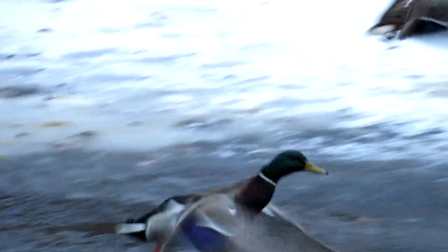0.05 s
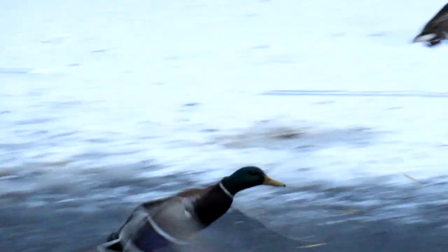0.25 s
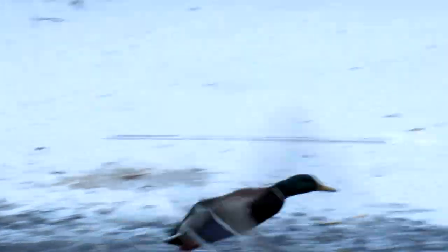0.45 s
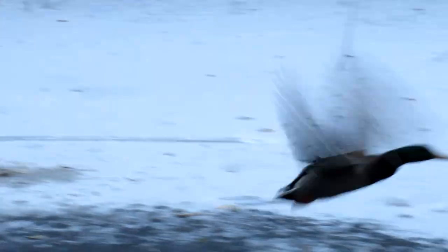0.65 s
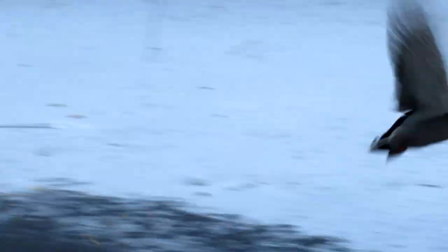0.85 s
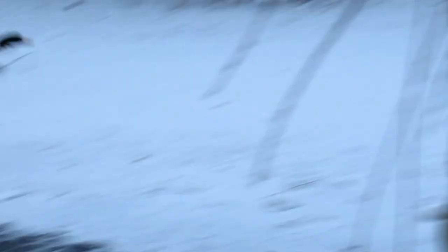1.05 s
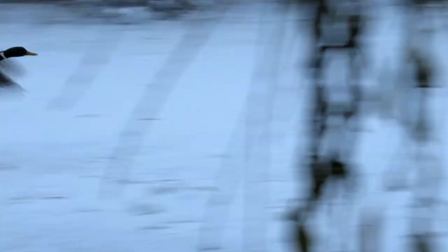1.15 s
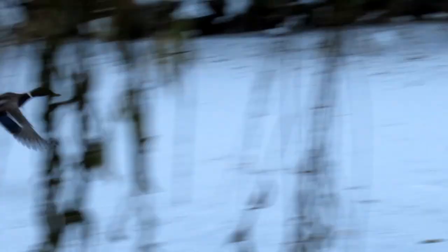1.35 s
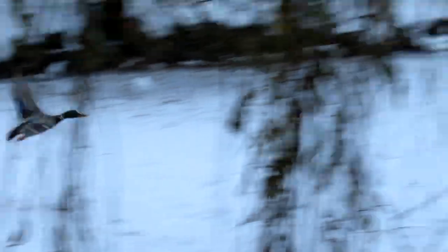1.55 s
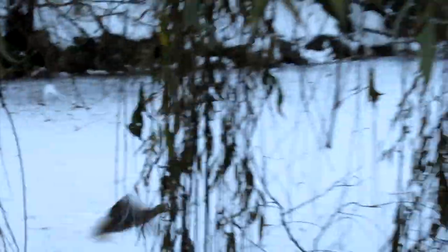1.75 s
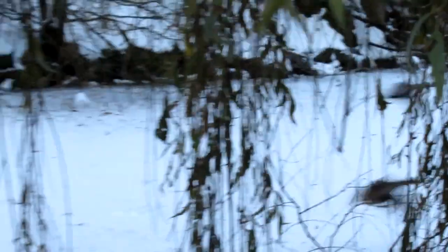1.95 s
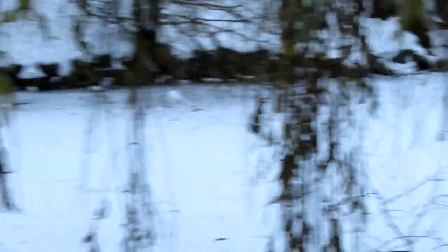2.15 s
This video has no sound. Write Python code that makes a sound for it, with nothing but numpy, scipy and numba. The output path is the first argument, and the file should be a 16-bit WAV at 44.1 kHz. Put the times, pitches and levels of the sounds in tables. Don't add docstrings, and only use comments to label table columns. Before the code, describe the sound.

A duck quacks hoarsely three times while its whistling wings beat rapidly away over a frozen pond.

```python
import sys
import numpy as np
from scipy import signal
from scipy.io import wavfile
from scipy.ndimage import uniform_filter1d
from numba import njit

SR = 44100
rng = np.random.default_rng(int(sys.argv[2]) if len(sys.argv) > 2 else 0)


def wav_record(signal):
    frames = np.transpose(np.atleast_2d(signal))
    bounded = np.clip(frames, -1, 1)
    quanta = np.round(bounded * 32767).astype(np.int16)
    wavfile.write(sys.argv[1], SR, quanta)


def amplitude_ratio(level_db):
    exponent = np.asarray(level_db, float) / 20
    return 10 ** exponent


N = 97020


def level(x, db):
    return x * amplitude_ratio(db) / np.sqrt(np.mean(x ** 2))


@njit
def svf(x, hz, width):
    y, b, l = np.empty(len(x)), 0., 0.
    for i in range(len(x)):
        g, k = np.tan(np.pi * hz[i] / SR), width / hz[i]
        v = (b + g * (x[i] - l)) / (1 + g * (g + k))
        b, l, y[i] = 2 * v - b, l + 2 * g * v, k * v
    return y


def resonance(x, hz, width_hz):
    return svf(x, np.clip(hz * np.ones(N), 15, .45 * SR), float(width_hz))


def steep_resonance(x, hz, width_hz):
    return resonance(resonance(x, hz, width_hz), hz, width_hz)


def airy_tone(hz, width_hz):
    return level(steep_resonance(rng.standard_normal(N), hz, width_hz), 0)


@njit
def pulses(hz, stretch, size):
    out, phase, p, k = np.zeros(len(hz) + 1), np.empty(len(hz)), 0., 0
    for i in range(len(hz)):
        step = hz[i] * stretch[k] / SR
        p += step
        if p >= 1:
            p, k = p - 1, k + 1
            out[i] += size[k] * p / step
            out[i + 1] += size[k] * (1 - p / step)
        phase[i] = p
    return out[:-1], phase


def walk(rate_hz):
    k = int(SR / rate_hz)
    steps = np.repeat(rng.standard_normal(N // k + 1), k)
    return 1.156 * uniform_filter1d(uniform_filter1d(steps, k), k)[:N]


def town(t):
    # (frequency [Hz], level per Hz [dB])
    spectrum = [(25, -23), (60, -10), (200, -12), (500, -15), (1300, -20.5), (3000, -26), (6000, -31.5),
                (15000, -33)]
    swell_db, flicker_db = 1., 2
    treble_fade_db_per_s = -3
    quietest_s, arch_db = 0.97, 1
    corner_hz, corner_db = np.transpose(spectrum)
    swell = walk(0.7)
    out = 0
    for hz in 25 * 2 ** np.arange(0, 9.6, .5):
        db = np.interp(np.log(hz), np.log(corner_hz), corner_db)
        db = db + swell_db * swell + flicker_db * walk(8.07)
        db = db + treble_fade_db_per_s * t * min(hz / 6000, 1)
        db = db + arch_db * (t - quietest_s) ** 2
        out = out + amplitude_ratio(db) * steep_resonance(rng.standard_normal(N), hz, hz / 0.92)
    return level(out, -35)


def motor_hum(t):
    # (time [s], pitch [Hz], level [dB])
    course = [
        (0.0, 81.9, -43),
        (0.12, 77.34, -37),
        (0.71, 77.5, -35.5),
        (0.72, 76.7, -37),
        (1.47, 77.47, -34.5),
        (1.88, 78.15, -42.5),
        (2.16, 80.14, -42),
        (2.2, 82, -42),
    ]
    # (multiple of the pitch [1], level [dB])
    overtones = [(1, 0), (2, -11), (3, -18.5), (4, -13)]
    flutter_db = 1.5
    time, pitch, loudness = np.transpose(course)
    hz = np.interp(t, time, pitch) * (1 + 0.01 * walk(10.98))
    turn = 2 * np.pi * np.cumsum(hz) / SR
    tone = 0
    for k, db in overtones:
        flutter = amplitude_ratio(db + flutter_db * walk(13.38))
        tone = tone + flutter * np.sin(k * turn + .5 * (k - 1) * walk(24.94))
    murmur = amplitude_ratio(-10) * airy_tone(92, 23)
    return np.sqrt(2) * (tone + murmur) * amplitude_ratio(np.interp(t, time, loudness))


def far_whistle(t):
    hz = 4467 * (1 + 0.0071 * walk(34.8))
    return amplitude_ratio(-52.5 + 4.7 * walk(22.02) + 2.0 * t) * airy_tone(hz, 340)


def feather_snaps(t):
    # (time [s], level [dB], centre [Hz], width [Hz])
    snaps = [(.245, -34, 610, 300), (.050, -33.5, 8500, 9000), (.06, -36.5, 3440, 400),
             (.206, -40.5, 4630, 350), (0.035, -39, 8900, 8000), (0.184, -39.5, 9000, 9000),
             (.535, -42, 8000, 6000), (.635, -48, 8040, 5000), (0.689, -33.5, 164, 148),
             (0.169, -35.5, 193, 98), (1.659, -35.5, 1100, 400), (1.664, -45.5, 8000, 5000),
             (0.081, -36, 9400, 9000), (0.2228, -31, 2540, 2570), (0.328, -36, 8500, 9190),
             (0.389, -39.5, 8700, 7000), (0.4521, -31, 2540, 2200), (.453, -39, 9900, 9000),
             (0.481, -33, 890, 900), (0.6, -39.5, 10600, 9050), (.627, -34.5, 875, 497),
             (1.125, -50, 5450, 500), (1.433, -41, 10990, 8000), (1.692, -41.5, 5510, 399.6),
             (1.728, -47, 13490, 3000)]
    shortest_s, cycles = .0012, 1.5
    out, air = 0, rng.standard_normal(N)
    for start, db, hz, width in snaps:
        u = np.clip(t - start, 0, 1) / max(shortest_s, cycles / width)
        out = out + level(steep_resonance(air, hz, width), db) * u * np.exp(1 - u)
    return out


def wings(t):
    # (time [s], level [dB], whistle shift [Hz], second feather [dB])
    beats = [(0.3131, -32.5, 60, 5), (0.4025, -34, 30, 0), (0.513, -30.5, 64, -5), (0.614, -36, 90, 6),
             (0.7224, -32.5, 30, -2), (0.829, -32.5, 30, -1), (0.9315, -33.5, 60, 3), (1.04, -34, -30, -3),
             (1.143, -38, 30, 0), (1.25, -36, -60, -1), (1.3646, -40, -30, 0), (1.4707, -43, -30, 8),
             (1.5773, -40, -30, -2), (1.689, -52, -30, 0), (1.7959, -43, -30, 0), (1.932, -45, -30, 2),
             (2.0206, -47, -28, -2), (2.133, -42, -30, 0)]
    stroke_s, lead_s, rise_share = 0.055, 0.017, .68
    low_lag_s, rush_lag_s = -0.0012, 0.0068
    second_sag_hz_per_s = 5600
    speed, gain, shift, second, sag = np.zeros((5, N))
    for start, db, shift_hz, second_db in beats:
        u = np.clip((t - start + lead_s) / stroke_s, 0, 1)
        rising = np.sin(np.pi / 2 * u / rise_share)
        falling = np.cos(np.pi / 2 * (u - rise_share) / (1 - rise_share))
        speed += np.where(u < rise_share, rising, falling)
        gain += amplitude_ratio(db) * np.sin(np.pi * u) ** 1.27
        shift += shift_hz * (u > 0) * (u < 1)
        second += amplitude_ratio(db + second_db) * np.sin(np.pi * u) ** 1.4
        sag += second_sag_hz_per_s * stroke_s * u * (u < 1)

    def late(x, lag_s):
        return np.interp(t - lag_s, t, x)

    hz = 4293 + 557 * speed + shift
    whistle = amplitude_ratio(-7) * (airy_tone(hz, 190) + amplitude_ratio(-10) * airy_tone(2 * hz, 550))
    whistle = gain * amplitude_ratio(2.3 * walk(69.28)) * whistle
    second_feather = second * amplitude_ratio(-15.5 + 2.2 * walk(69.9)) * airy_tone(5330 - sag, 210)
    low_whistle = airy_tone(3660 + 250 * late(speed, low_lag_s), 120) * amplitude_ratio(-14.5 + 1.7 * walk(8.5))
    low_whistle = late(gain, low_lag_s) * low_whistle
    rush = level(resonance(rng.standard_normal(N), 7000, 9020), 0) * amplitude_ratio(0.83 * walk(62))
    rush = amplitude_ratio(-14 - 10 * t) * rush * late(gain, rush_lag_s)
    return whistle + second_feather + low_whistle + rush


def knocks(t):
    # (level [dB], ring [Hz], pitch sag [share])
    rings = [(-22, 2500, 0.4), (-24, 3500, 1.1), (-25.5, 770, 0), (-28.5, 1970, 0), (-26, 1700, 0.029),
             (-21.5, 2340, 0.057), (-7, 362, 1.33), (-15.5, 765, 0.41), (-25, 2030, -0.5),
             (-15.5, 220, 0.15), (-30, 540, 0.5)]
    onsets = [.4511, .4536, 1.002, 1.0022, 1.0062, 1.0455, 1.0474, 1.0693, 1.0695, 1.0736, 1.876]
    decays = [.007, .006, .02, .015, .018, .009, .022, .007, .008, .013, .06]
    sag_s, push_cycles = 0.00087, .12
    out = 0
    for start, t60, (db, hz, sag) in zip(onsets, decays, rings):
        u = np.clip(t - start, 0, 1)
        push = 1 - np.exp(-u * hz / push_cycles)
        cycles = hz * (u + sag * sag_s * (1 - np.exp(-u / sag_s)))
        out = out - amplitude_ratio(db - 60 * u / t60) * push * np.sin(2 * np.pi * cycles)
    return out


def shore_echo(voice, t):
    t60_s, gap_s = 0.53, 0.0098
    lag = t[:SR // 2]
    tail = rng.standard_normal(len(lag)) * amplitude_ratio(-60 * lag / t60_s) * (lag > gap_s)
    tail = tail * amplitude_ratio(-18) / np.sqrt(np.sum(tail ** 2))
    return signal.fftconvolve(voice, tail)[:N]


def quacks(t):
    # (time [s], level [dB], pulse rate [Hz], brightness [dB])
    calls = [
        [(0.735, -50, 243.5, -8), (0.745, -32.5, 243.3, 1), (0.785, -20, 290, -4.5), (0.807, -21, 291, 2.5),
         (0.821, -25, 302.7, -7), (0.837, -21, 307.7, -6), (0.855, -17, 327.3, 4), (0.863, -23.5, 332, 3),
         (0.872, -26, 322, -10)],
        [(1.262, -43, 282.1, -2), (1.278, -27, 276.2, -9), (1.322, -15, 301.1, 1.5), (1.34, -20, 293.7, -6),
         (1.36, -19, 289.7, -7), (1.374, -17.5, 320, 4), (1.386, -16, 331, 1.5), (1.424, -17, 298.2, 4.5),
         (1.436, -29, 302.3, 4)],
        [(1.755, -40, 232.4, -7), (1.777, -27.5, 239.2, -2), (1.815, -21, 291.2, 0.5), (1.843, -18, 295, -0.5),
         (1.875, -18, 292.8, -0.5), (1.905, -20, 308.7, 2), (1.923, -19.5, 275.8, 3.5), (1.943, -25, 268.6, 4),
         (1.955, -33, 260.3, -7.5)],
    ]
    # (centre [Hz], level [dB], share of brightness [1])
    throat = [(1700, 0, -0.55), (2196, 3, 0.43), (2636, -12, -0.057), (614, -18.5, .27), (291, -20, -0.082)]
    throat_widths = [290, 290, 360, 840, 140]
    # (centre [Hz], width [Hz])
    bill = [(3570, 800), (4500, 900), (6200, 1600), (8500, 1800), (12500, 5000)]
    bill_levels = [-21, -22, -25.5, -32.5, -45]
    # (rasp [dB], extra above 5 kHz [dB])
    hoarseness = [
        (2, -3.5),
        (0.5, -1),
        (0.5, 0.5),
    ]
    jitter, shimmer_db, alternate_db = .04, 2.4, .8
    breath_share = .3
    rows = np.vstack([np.array(q, float) for q in calls])
    db, hz, bright = (np.interp(t, rows[:, 0], rows[:, c]) for c in (1, 2, 3))
    sounding = sum((t >= q[0][0]) & (t <= q[-1][0]) for q in calls)

    length_luck, size_luck = rng.standard_normal((N // 50, 2)).T
    alternate = alternate_db * (-1) ** np.arange(len(size_luck))
    size = amplitude_ratio(shimmer_db * np.clip(size_luck, -3, 1) + alternate)
    clicks, phase = pulses(hz, 1 + jitter * length_luck, size)
    breath = level(np.exp(-phase / breath_share) * rng.standard_normal(N), 0)
    source = level(clicks, 0) + amplitude_ratio(-9) * breath
    hiss = level(clicks, -5.5) + amplitude_ratio(-0.5) * breath

    voice = 0
    for k, (width, (f, g, share)) in enumerate(zip(throat_widths, throat)):
        centre = f * (1 + .025 * walk(30))
        chest_flicker = (f < 1000) * 4.5 * walk(44.97)
        ring = steep_resonance(source, centre, width)
        voice = voice + (-1) ** k * amplitude_ratio(g + share * bright + chest_flicker) * ring
    ends = [q[-1][0] + .1 for q in calls[:-1]]
    rasp, top = np.array(hoarseness)[np.searchsorted(ends, t)].T
    for (f, width), g in zip(bill, bill_levels):
        gain_db = g + rasp + (f > 5000) * top + 0.03 * (db + 22.5) + 2.0 * walk(90)
        voice = voice + amplitude_ratio(gain_db) * steep_resonance(hiss, f, width)
    voice = level(voice, 0) * amplitude_ratio(db) * uniform_filter1d(sounding * 1., size=200)
    return voice + shore_echo(voice, t)


def scene():
    t = np.arange(N) / SR
    background = town(t) + motor_hum(t) + far_whistle(t)
    return (background + feather_snaps(t) + wings(t) + knocks(t) + quacks(t))[None]


def band_limit(x):
    return signal.sosfilt(signal.butter(12, 15940, fs=SR, output="sos"), x)


def record(dry):
    t = np.arange(N) / SR
    top_cut = signal.ellip(10, .1, 50, 15150, fs=SR, output="sos")
    mix = signal.sosfiltfilt(top_cut, dry)
    mix = mix * amplitude_ratio(-3 * np.clip(1 - t / 0.27, 0, 1))
    return band_limit(mix)


dry = scene()
out = record(dry)
wav_record(out)
```